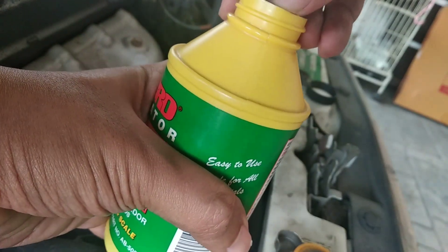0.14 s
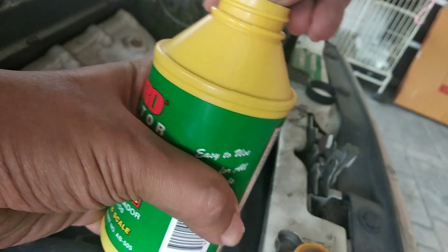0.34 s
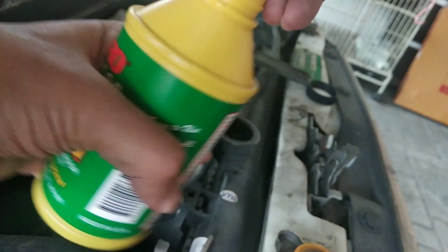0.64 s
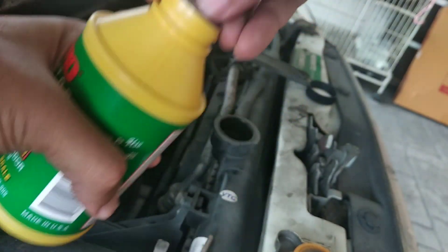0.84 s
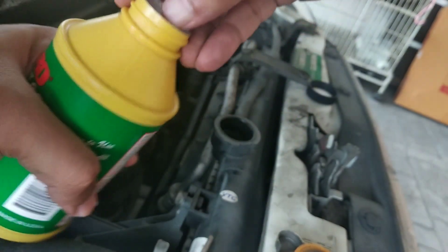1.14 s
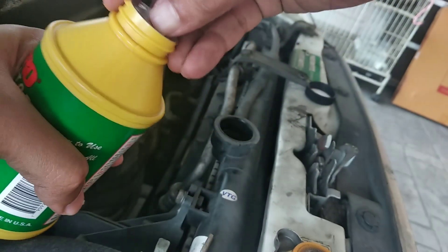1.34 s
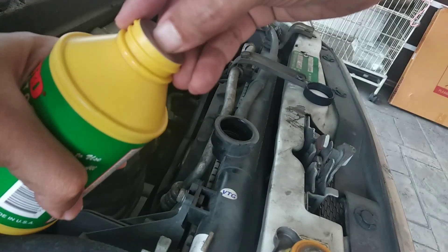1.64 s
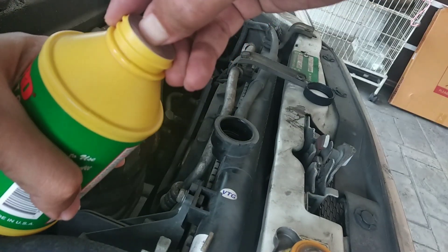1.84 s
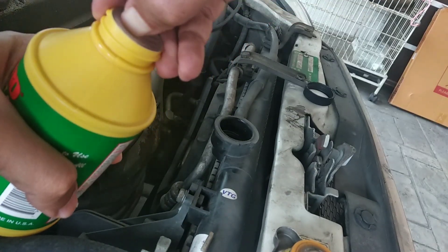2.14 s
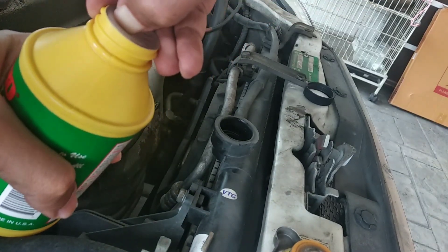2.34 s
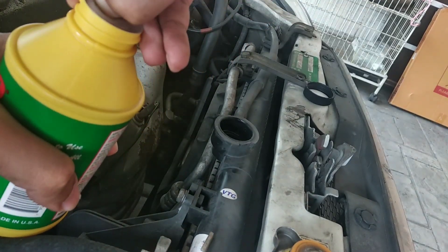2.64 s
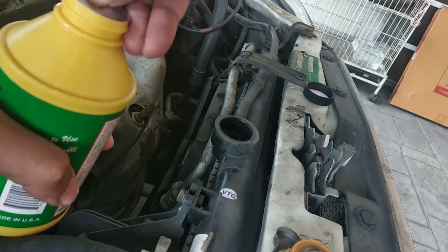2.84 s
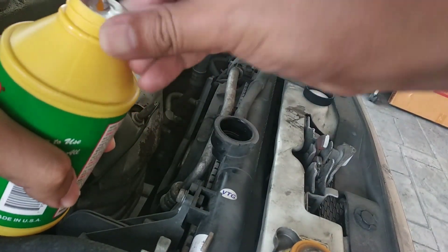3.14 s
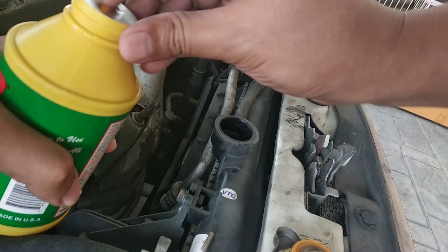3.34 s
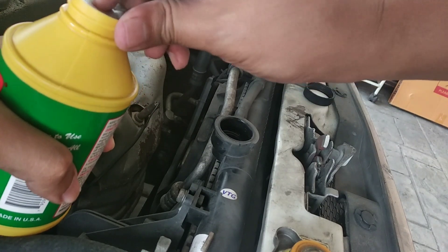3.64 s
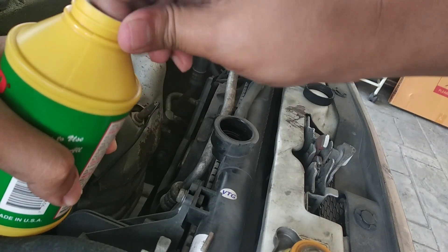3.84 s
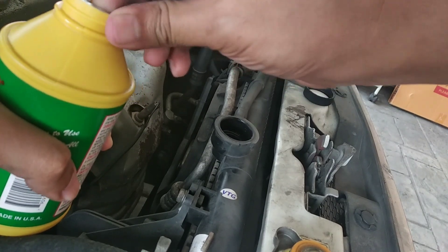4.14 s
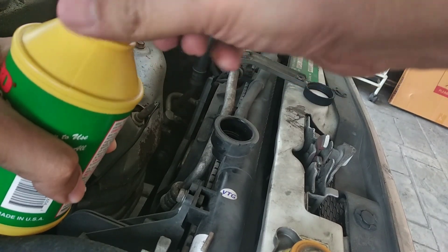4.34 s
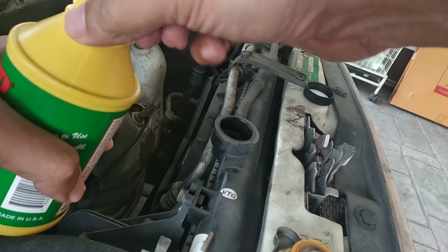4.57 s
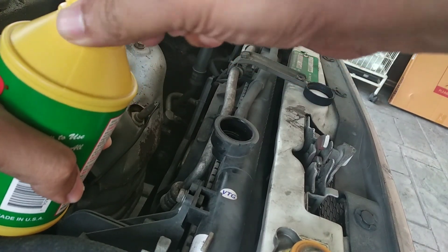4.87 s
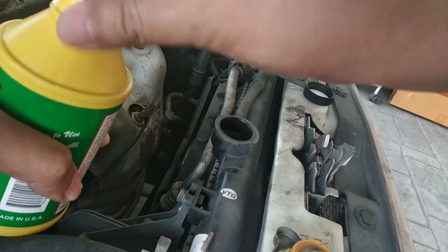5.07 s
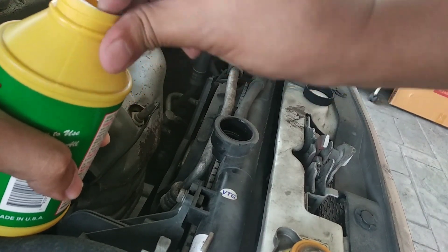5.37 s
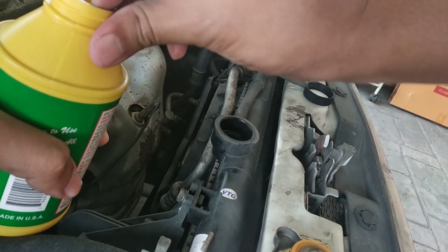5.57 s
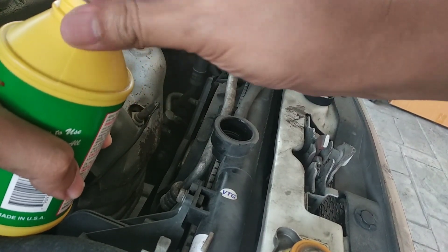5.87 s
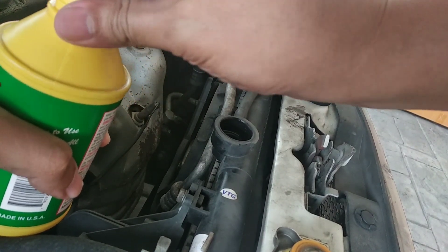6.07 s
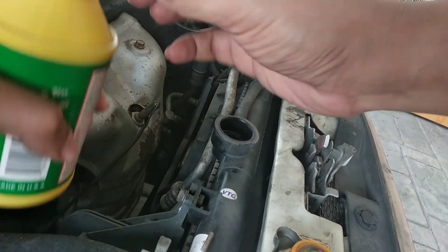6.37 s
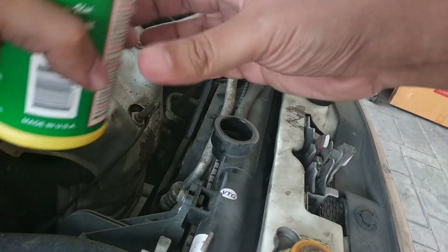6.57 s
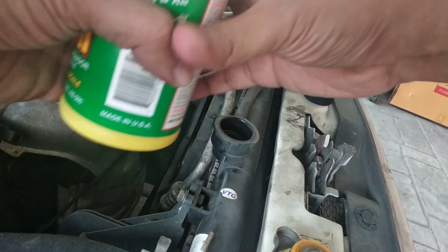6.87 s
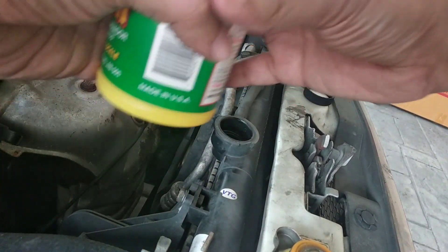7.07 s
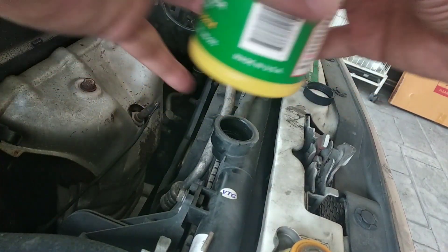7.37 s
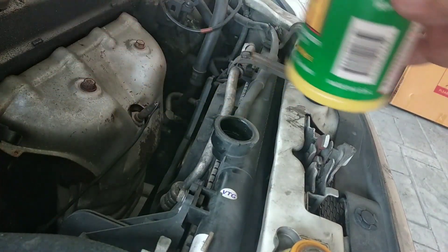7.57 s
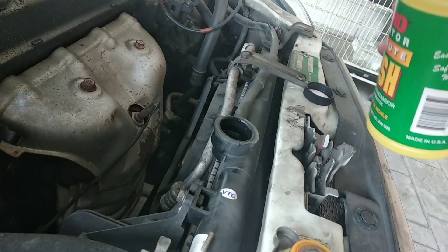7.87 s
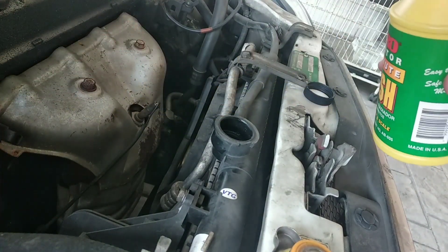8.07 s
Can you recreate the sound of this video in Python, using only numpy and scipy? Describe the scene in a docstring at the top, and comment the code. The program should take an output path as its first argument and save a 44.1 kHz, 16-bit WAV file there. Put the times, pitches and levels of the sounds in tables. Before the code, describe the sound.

Fingers grip a plastic bottle and tear its foil seal with sharp crackling snaps and hollow pops, over soft outdoor hiss and faint motor drone.

```python
"""Skin slides on plastic and a grip shifts with a low rumble, close to a phone, in soft outdoor hiss and drone.
Then the bottle's wall pops under the fingers: pushes ring its resonances, and a low thud goes with each.
Fingers tear at the foil seal: crackling noise swells to snaps, coloured by broad foil and bottle bands;
sharp cracks are short noise bursts with faint thin tones after them. Rubs and drags are filtered grains;
air, drone and rumble are shaped noise, a distant motor adds sine tones, and a short tail surrounds the bottle."""
import sys
import numpy as np
from scipy import signal
from scipy.fft import rfft, irfft
from scipy.io import wavfile
from scipy.ndimage import map_coordinates

SR = 44100
rng = np.random.default_rng(int(sys.argv[2]) if len(sys.argv) > 2 else 0)


def generate_wav(sig):
    """Save sig (samples, or channels by samples) to the path in sys.argv[1] as 16-bit PCM at SR."""
    pcm = np.round(np.clip(np.atleast_2d(sig).T, -1, 1) * 32767).astype(np.int16)
    wavfile.write(sys.argv[1], SR, pcm)


N = 362052
TIME = np.arange(N) / SR
SHOT = np.arange(SR // 5) / SR  # time inside one event [s]

# Spectrum shapes of outdoor hiss, low drone and handling rumble: (frequency [Hz], relative gain [dB])
AIR_COLOUR = [(270, -21), (340, -10.5), (420, 1.5), (600, -1), (1000, -5.5), (1700, -9.5), (2200, -8.5),
              (2700, -10.5), (5000, -15), (7500, -12.5), (10000, -15), (12500, -22.5), (16000, -23)]
DRONE_COLOUR = [(60, -42), (110, 0.5), (190, 5), (260, 0), (340, 1.5), (420, -6.5), (600, -65)]
RUMBLE_COLOUR = [(20, -24), (40, -16), (60, 1.5), (78, 7), (130, 6), (170, -8), (220, -12.5), (500, -79)]
# Level of the low drone, which dips at times: (time [s], level [dB])
DRONE_LEVELS = [(0.0, -67), (0.48, -72), (0.89, -85), (1.76, -103), (2.56, -82), (2.8, -65.5),
                (3.82, -62.5), (6.15, -62), (6.38, -70), (7.22, -65.5), (7.42, -83), (7.75, -77.5),
                (7.96, -63), (8.21, -69)]
# A distant motor hums within the drone: (frequency [Hz], level against the drone [dB])
MOTOR_HUM = [(75.8, -6.5), (301.5, -11.5)]
# Its faint whine: (frequency [Hz], level [dB])
MOTOR_WHINE = [(1217, -85.5), (2121, -88.5), (2202, -86)]
# Skin slides over plastic and foil, at times ringing the hollow bottle:
# (centre time [s], half length [s], peak level [dB], centre [Hz], width [Hz])
RUBS = [(0.0, 0.019, -49, 3200, 8300), (0.522, 0.049, -62.5, 2260, 8300), (0.616, 0.024, -57.5, 2590, 8300),
        (0.674, 0.0079, -54, 5900, 8300), (0.729, 0.025, -54.5, 2200, 900),
        (0.933, 0.023, -57.5, 4670, 8300), (1.166, 0.044, -60, 10000, 5500), (1.38, 0.041, -61, 5760, 8300),
        (1.462, 0.018, -47.5, 2350, 900), (1.875, 0.14, -65, 3370, 8300), (1.879, 0.011, -60, 8800, 1500),
        (2.87, 0.015, -59.5, 4000, 8300), (2.942, 0.011, -62, 8300, 4000), (3.105, 0.0082, -61, 1980, 5000),
        (3.185, 0.016, -62, 4250, 8300), (3.283, 0.027, -57, 5800, 8300), (3.393, 0.029, -58, 7040, 8300),
        (3.909, 0.024, -45.5, 463, 517), (3.95, 0.065, -57, 3650, 3530), (4.117, 0.0079, -65, 7700, 8300),
        (4.502, 0.016, -62.5, 9000, 8300), (6.276, 0.017, -59, 7550, 1210), (6.569, 0.01, -65, 950, 260),
        (6.86, 0.078, -63, 8700, 8300), (6.88, 0.013, -63, 925, 280), (7.063, 0.007, -61.5, 925, 220),
        (7.124, 0.0072, -61.5, 950, 220), (7.35, 0.012, -67, 925, 200), (7.83, 0.019, -64, 11400, 8300),
        (7.972, 0.029, -62, 11100, 8300)]
# The hands shift their grip:
# (start [s], length [s], rumble level [dB], level of the skin drag [dB], pitch of the drag [Hz])
GRIP_SHIFTS = [(0.0, 0.36, -49.5, -78, 200), (0.338, .11, -47.5, -72, 200), (0.509, 0.039, -59, -56.5, 290),
               (0.561, 0.056, -55, -61.5, 168), (0.674, 0.061, -55, -70.5, 303),
               (0.755, 0.041, -58, -92, 201), (0.928, 0.024, -60.5, -58.5, 226),
               (1.037, 0.024, -67, -92, 200), (1.221, 0.18, -48, -63.5, 340),
               (1.416, 0.097, -56.5, -81, 337), (1.64, 0.075, -78, -66.5, 228),
               (1.723, 0.043, -61, -62.5, 393), (1.784, 0.03, -80, -65, 322),
               (1.903, 0.026, -57, -61.5, 577), (2.216, 0.029, -68, -73, 430),
               (2.46, 0.03, -62.5, -89, 215), (2.537, 0.031, -50.5, -53, 185),
               (2.735, 0.027, -82, -62, 276), (3.869, 0.079, -55.5, -54, 286),
               (6.206, 0.072, -59, -79, 200), (6.51, 0.04, -58, -68, 140), (6.669, 0.045, -66, -60.5, 205),
               (6.99, 0.027, -82, -60, 212), (7.275, 0.044, -62.5, -58.5, 195),
               (7.34, 0.12, -87, -66.5, 180), (7.51, 0.087, -69, -91, 163), (7.646, 0.04, -74, -73, 149),
               (7.866, 0.06, -62, -71, 192), (8.034, 0.13, -56, -70, 188)]
# The wall pops under the fingers:
# (time [s], level [dB], wall pitch [Hz], sharp edge against the wall [dB], thud against the pop [dB])
POPS = [(0.4640, -47.5, 1704, -7.5, -20), (0.587, -57.5, 1590, 4, -2), (0.7154, -38, 1485, -1, -46),
        (0.7852, -51, 1430, -22, -42), (0.888, -64, 1510, 1, -22), (0.9235, -43.5, 1510, -7.5, -3.5),
        (0.934, -52, 1610, 6, -8), (0.959, -65, 1590, -1, 4), (1.3844, -47.5, 1560, 9, -43),
        (1.4586, -40.5, 2360, -13, -28), (3.8675, -43, 590, -11, -3), (4.634, -50, 1007, -24, -18),
        (4.969, -56, 804, -20, -26), (5.7262, -44.5, 937, -30, -35), (6.2664, -53.5, 970, -17, -16),
        (6.272, -51.5, 927, -27, -18), (6.308, -57, 950, -29, -26), (7.117, -64.5, 940, -15.5, -19)]
# Overtones of a popping wall: (frequency [Hz], width [Hz], relative level [dB])
WALL_OVERTONES = [(2040, 450, 20.5), (2660, 270, 15.5), (3870, 600, -35), (5030, 150, -24), (6660, 600, -4),
                  (8300, 280, -16)]
# The seal rips: (time of the snap [s], swell [s], fade [s], level [dB], snap against the crackle [dB],
# pitch of the loose flap [Hz], then against the foil: sheen [dB], rim and wall [dB], hollow bottle [dB];
# left minus right [dB]; narrow facet bands, each (frequency [Hz], level against the foil [dB]))
RIPS = [(0.718, 0.023, 0.0094, -50, -20, 8750, -26, -4.5, -0.5, -0.5, [(2950, -1), (5200, -3), (8900, -4)]),
        (1.4584, 0.013, 0.011, -41.5, -17, 6000, -31, -10, -19, -4, [(3550, -4.5), (5720, -12),
        (9150, -7)]), (2.492, 0.0073, 0.041, -54.5, -30, 5860, 10, -38, -32, -25, [(5400, -4)]),
        (2.518, 0.0067, 0.014, -28.5, -14, 7200, 3.5, -20, -7.5, -2, [(4080, -10.5), (4900, -16),
        (6030, -6), (9400, -5)]),
        (3.239, 0.0087, 0.011, -54, -29, 6360, -7, -11, 1.5, -7.5, [(3700, -0.5)]),
        (3.4888, 0.0072, 0.013, -38, -9, 10500, 9.5, -17.5, -14, -6, [(3150, -35), (5150, -7.5)]),
        (3.6780, 0.01, 0.011, -50, -9, 7150, -18, -8, -4, -5, []),
        (3.8659, 0.0068, 0.019, -31.5, -6.5, 8300, 7, -1, -3.5, -2, [(3700, -19), (4450, -12), (5100, -6),
        (10250, -1.5)]), (3.88, 0.0028, 0.0082, -42.5, 2, 7300, -6, -11, -1, -2.5, [(2700, -3),
        (4000, -0.5)]), (3.925, 0.017, 0.043, -52, -14, 8300, 9.5, 1.5, 0, -3, [(3700, 0), (4350, -12),
        (5750, -12)]), (4.203, 0.018, 0.017, -47.5, -0.5, 6900, 1.5, -7, -3, -6.5, [(3720, 0), (5250, -6.5),
        (6050, -8)]), (4.2847, 0.017, 0.022, -52, -4, 7400, -14, -17, -9, -9, [(3720, -24)]),
        (4.388, 0.015, 0.019, -51, -5, 7460, 4.5, -33, -14, -6.5, [(5400, -17), (7450, 3.5)]),
        (4.595, 0.012, 0.015, -55.5, -19, 9100, 6, -15, -18, -5, []),
        (4.633, 0.009, 0.0097, -41.5, -5, 6570, 5, -8, -5, -5, [(2920, -7.5), (4500, -23), (5420, -14),
        (10550, -13)]), (4.9690, .011, 0.031, -55.5, -5, 7950, 3, -17, -4, -4, []),
        (5.727, 0.011, 0.011, -40.5, -5.5, 7650, -9, -21.5, -7, -6.5, [(4100, -21), (5300, -16)]),
        (6.32, 0.021, 0.014, -54, -18, 7300, -12, -11.5, 0, -9, [(7450, -10)]),
        (7.385, 0.0059, 0.016, -73, -22, 3830, -18, 7.5, -2, -3, [])]
# Broad bands that colour every rip, in the order foil, sheen, rim, wall, neck, thud:
# (frequency [Hz], width [Hz], relative level [dB], left minus right [dB])
RIP_BANDS = [(7800, 3600, -2.5, 7.5), (11900, 9800, -3.5, 5), (4250, 1840, 0.5, 0.5), (2600, 3700, -1.5, 4),
             (946, 360, -7, 0.5), (252, 530, -13, 1.5)]
# The seal cracks sharply: (time [s], level [dB], centre [Hz], width [Hz], decay [s],
# faint tones against the crack [dB], left minus right [dB])
CRACKS = [(0.7155, -41, 2780, 2000, 0.0011, -22, 0), (1.458, -38.5, 4760, 6500, 0.00066, -27, -5),
          (1.468, -53, 6960, 6000, 0.0013, -19, -2), (2.5109, -35, 8050, 5000, 0.0041, -5, -7),
          (3.4902, -40.5, 8600, 9000, 0.00056, -14, -4), (3.858, -30, 8400, 9050, 0.0063, -16, 2),
          (3.866, -40, 4440, 2620, 0.0026, -1, 1), (3.9116, -50, 5000, 6000, .001, -12, -2),
          (3.9485, -68, 4500, 6000, .001, -15, -2), (4.2034, -53, 4170, 3000, .0015, -22, -8),
          (4.21, -56, 6000, 6000, 0.0011, -18, -4), (4.2846, -62, 7300, 4500, .0008, -18, -5),
          (4.389, -60, 7700, 5000, 0.0014, -18, -6), (4.623, -49, 9500, 9000, .004, -18, -5),
          (4.6358, -46.5, 6800, 1600, .0015, -23, -7), (4.647, -54, 11000, 9000, .002, -16, -3),
          (5.7262, -44.5, 7650, 2200, 0.0016, -18, -10), (6.3202, -52.5, 7200, 3000, 0.0028, -18, -4)]
# Faint thin tones added after each crack: (frequency [Hz], relative level [dB])
FINE_TONES = [(3322, -9.5), (4271, 0), (4594, 1), (4912, -9.5), (5541, 2), (6029, -0.5), (6938, 9),
              (7047, -3.5), (8146, -9), (8822, -2), (9122, -2), (9315, 10), (9455, 5), (10148, 0)]
# The bottle moves across the phone: (time [s], delay of the seal at the left port [samples],
# the same for the wall [samples]); below zero the left port hears it first
BEARING = [(0.5, 8, 6), (1.5, 9.5, 7), (2.5, 9, 9.5), (3.9, 9.5, 12.5), (5.7, 17.5, 13.5), (6.3, 17.5, 18),
           (6.8, 6.5, 6), (7.7, -14.5, -12)]

AIR_DB = -62.5
SHIFT_ATTACK_S, SHIFT_RELEASE_S, DRAG_WIDTH_HZ = 0.015, 0.01, 89
GRAINS_PER_RIP, JERKS_PER_S, SNAP_S = 150, 420, .0006
FACET_WIDTH_HZ = 370
FINE_TONES_T60_S = 0.25
TOP_HZ = 15900


def undb(db):
    """Decibels to gain."""
    return 10 ** (np.asarray(db) / 20)


def unit(x):
    """Scale each channel to unit energy."""
    return x / np.sqrt(np.sum(x ** 2, axis=-1, keepdims=True))


def burst(x, db):
    """Scale an event to a level, counted as rms over 30 ms."""
    return unit(x) * undb(db) * np.sqrt(.03 * SR)


def pan(db):
    """Left and right gains for a level difference, left minus right."""
    return undb(np.array([[db], [-db]]) / 2)


def add(track, x, s):
    """Mix an event in from time s on."""
    start = int(s * SR)
    track[:, start:start + x.shape[-1]] += x[..., :N - start]


def ring(x, hz, width_hz):
    """One resonance, gain 1 at its centre."""
    return signal.lfilter(*signal.iirpeak(hz, hz / width_hz, fs=SR), x)


def steep(x, hz, width_hz):
    """A resonance applied twice, at unit energy."""
    return unit(ring(ring(x, hz, width_hz), hz, width_hz))


def walk(rate):
    """Random wander through `rate` new values a second, with a spread near 1."""
    steps = rng.standard_normal(N // 10)
    return np.interp(TIME * rate, np.arange(len(steps)), steps)


def noise(colour, likeness):
    """Stereo noise of rms 1 with a given spectrum and left-right correlation."""
    hz, db = np.transpose(colour)
    bins = np.fft.rfftfreq(N, 1 / SR)
    gain = undb(np.interp(np.log(bins + 1), np.log(hz), db))
    shaped = irfft(rfft(rng.standard_normal((2, N))) * gain, N)
    mid, side = unit(shaped) * np.sqrt(N / 2)
    return np.sqrt(1 + likeness) * mid + np.sqrt(1 - likeness) * np.array([side, -side])


def tones(lines, waver_db, drift):
    """Sine tones that waver in level and phase (drift in radians)."""
    out = np.zeros(N)
    for hz, db in lines:
        level = np.sqrt(2) * undb(db + waver_db * walk(10.0))
        out += level * np.sin(2 * np.pi * hz * TIME + drift * walk(3.6))
    return out


def clicks(shape, per_s, spread_db):
    """Tiny clicks at random moments, of random sign and uneven size."""
    happen = rng.random(shape) < per_s / SR
    sign = np.sign(rng.standard_normal(shape))
    size = undb(spread_db * np.clip(rng.standard_normal(shape), -2, 2))
    return happen * sign * size


def outdoors(bass_db=-1.0):
    """Soft hiss and a low drone whose level dips at times, with the hum and whine of a distant motor."""
    air = noise(AIR_COLOUR, likeness=0.074) * undb(AIR_DB + .5 * walk(36))
    bass = noise(RUMBLE_COLOUR, likeness=0.87) * undb(bass_db + 1.4 * walk(4.9))
    hum = tones(MOTOR_HUM, waver_db=1.5, drift=0.23)
    low = noise(DRONE_COLOUR, likeness=0.76) * undb(3.1 * walk(21)) + bass + hum
    drone = low * undb(np.interp(TIME, *np.transpose(DRONE_LEVELS)))
    whine = tones(MOTOR_WHINE, waver_db=3.0, drift=1.0)
    return air + drone + whine


def rubs():
    """Fine stick-slip grains that swell and fade with each slide of a finger."""
    out = np.zeros((2, N))
    pressure = undb(1.5 * walk(46))
    grains = clicks((2, N), per_s=3700, spread_db=7.5) * pressure
    for s, half, db, hz, width in RUBS:
        slide = np.exp(-((TIME - s) / half) ** 2 / 2)
        out += steep(grains, hz, width) * np.sqrt(N) * undb(db) * slide
    return out


def shifts(flutter_db=2.0):
    """Each change of grip shakes the phone with a low flutter, while pressed skin drags on the bottle."""
    shake = noise(RUMBLE_COLOUR, likeness=0.9) * undb(flutter_db * walk(42))
    grains = clicks(N, per_s=1300, spread_db=8.5)
    out = np.zeros((2, N))
    for s, length, rumble_db, drag_db, drag_hz in GRIP_SHIFTS:
        drag = steep(grains, drag_hz, DRAG_WIDTH_HZ) * np.sqrt(N)
        rise = (TIME - s) / SHIFT_ATTACK_S
        fall = (s + length - TIME) / SHIFT_RELEASE_S
        effort = np.exp(np.minimum(np.minimum(rise, fall), 0))
        out += effort * (undb(rumble_db) * shake + undb(drag_db) * drag)
    return out


def pops(wall_q=5.0, grain_db=-9, thud_s=0.017, thud_width_hz=260, scuff_db=-3, scuff_s=0.0073, soft_hz=8000):
    """The wall buckles: one push rings its main mode and overtones, and the bottle thuds in the hand."""
    out = np.zeros((2, N))
    for s, db, hz, edge_db, thud_db in POPS:
        push = signal.unit_impulse(len(SHOT))
        rough = unit(rng.standard_normal((2, len(SHOT))) * np.exp(-SHOT / scuff_s))
        scuff = push + undb(scuff_db) * rough
        wall = steep(push + undb(grain_db) * scuff, hz, hz / wall_q)
        edge = unit(sum(undb(g) * ring(scuff, f, w) for f, w, g in WALL_OVERTONES))
        add(out, burst(wall + undb(edge_db) * edge, db), s)
        # the finger presses in just before the wall gives
        thud = steep(rng.standard_normal(len(SHOT)) * np.exp(-SHOT / thud_s), 217, thud_width_hz)
        add(out, burst(thud, db + thud_db), s - .007)
    # the fingertips damp the top
    return signal.sosfilt(signal.butter(2, soft_hz, fs=SR, output="sos"), out)


def rips(flap_width_hz=900, flap_db=-4, apart_db=-1, rounding=1.47, facet_lean_db=3, facet_focus=1.7, stutter_db=1.5):
    """Crackling noise swells briefly to a snap and fades, coloured by broad foil and bottle bands."""
    out = np.zeros((2, N))
    lead = .07  # room for the swell before the snap [s]
    t = SHOT - lead
    for s, swell, fade, db, snap_db, flap_hz, sheen_db, shell_db, hollow_db, pan_db, facets in RIPS:
        envelope = np.exp(-np.maximum(-t / swell, t / fade) ** rounding)
        # the level stutters in small jerks
        jerks = np.interp(SHOT * JERKS_PER_S, np.arange(len(t)), rng.standard_normal(len(t)))
        envelope = envelope * undb(stutter_db * jerks)
        bands = [(flap_hz, flap_width_hz, flap_db, 0)] + list(RIP_BANDS)
        # rim and wall share one level, as do the neck and the thud of the hollow bottle
        drives = [0, 0, sheen_db, shell_db, shell_db, hollow_db, hollow_db]
        # narrow facet bands change with every rip
        bands += [(hz, FACET_WIDTH_HZ, facet_db, facet_lean_db) for hz, facet_db in facets]
        drives += [0] * len(facets)
        for (hz, width, band_db, lean_db), drive_db in zip(bands, drives):
            # facets keep closer to the peak
            shape = envelope ** (facet_focus if width == FACET_WIDTH_HZ else 1)
            # each band has its own grains; a slow rip spreads them into a rattle
            grains = clicks((3, len(t)), per_s=GRAINS_PER_RIP / (swell + fade), spread_db=4.5)
            crackle = unit(grains * shape)
            snap = unit(rng.standard_normal((3, len(t))) * (t >= 0) * np.exp(-abs(t) / SNAP_S))
            # the snap is blunter than the crackle and weakens above 7 kHz
            blunt_snap = undb(snap_db) * min(7000 / hz, 1) * snap
            common, *sides = steep(crackle + blunt_snap, hz, width)
            # the treble differs more from side to side
            spread = undb(apart_db) * min(hz / 3000, 1) * np.array(sides)
            heard = burst(common + spread, db + band_db + drive_db)
            add(out, heard * pan(pan_db + lean_db), s - lead)
    return out


def cracks():
    """The seal gives way at one spot: an abrupt, very short burst."""
    out = np.zeros((2, N))
    for s, db, hz, width, decay, _, pan_db in CRACKS:
        split = rng.standard_normal(len(SHOT)) * np.exp(-SHOT / decay)
        add(out, burst(steep(split, hz, width), db) * pan(pan_db), s)
    return out


def fine_tones():
    """Faint thin tones added after each crack, weighted towards its centre frequency."""
    out = np.zeros((2, N))
    tone_hz, tone_db = np.transpose(FINE_TONES)
    decay = np.exp(-np.log(1000) * SHOT / FINE_TONES_T60_S)
    for s, db, hz, width, _, tones_db, pan_db in CRACKS:
        weights = undb(tone_db) / (1 + (2 * (tone_hz - hz) / width) ** 2)
        start_phase = rng.random((len(tone_hz), 1))  # in cycles
        sines = np.sin(2 * np.pi * (tone_hz[:, None] * SHOT + start_phase))
        add(out, burst(weights @ sines * decay, db + tones_db) * pan(pan_db), s)
    return out


def space(x, lag, near_db, tail_db, t60=0.33):
    """Sound reaches the nearer port first; the hands scatter it and nearby walls add a short tail."""
    t = np.arange(SR // 2) / SR
    near, tail = rng.standard_normal((2, 2, len(t)))
    near = unit(near * (t > .001) * np.exp(-t / 0.0048))
    dull = signal.sosfiltfilt(signal.butter(2, 9500, fs=SR, output="sos"), tail)
    bright = 0.98 * (tail - dull)
    t60_top = t60 * 3 / 4  # the treble dies sooner
    fading = dull * undb(-60 * t / t60) + bright * undb(-60 * t / t60_top)
    # echoes come back in uneven clumps and build up over a few milliseconds
    clumps = undb(2.2 * walk(300)[:len(t)])
    tail = unit(fading * clumps * (1 - np.exp(-t / 0.0039)))
    left = map_coordinates(x[0], [np.arange(N) - lag], order=5)  # fractional delay
    direct = np.array([left, x[1]])
    echoes = undb(near_db) * near + undb(tail_db) * tail
    return direct + signal.fftconvolve(x, echoes, axes=1)[:, :N]


def scene(lean_db=-0.8, wall_lean_db=-2.0):
    """Bottle, seal and hands over the outdoor background, which leans a little to the right."""
    when, seal_lag, wall_lag = np.transpose(BEARING)
    background = (outdoors() + shifts()) * pan(lean_db)
    seal = space(rubs() + rips(), np.interp(TIME, when, seal_lag), near_db=-3.0, tail_db=-11)
    struck = pops() * pan(wall_lean_db) + cracks()
    bottle = space(struck, np.interp(TIME, when, wall_lag), near_db=-7.5, tail_db=-23)
    return background + seal + bottle + fine_tones()


def record(dry):
    """The phone cuts the top with a steep low-pass."""
    return signal.sosfilt(signal.ellip(10, .2, 80, TOP_HZ, fs=SR, output="sos"), dry)


dry = scene()
out = record(dry)
generate_wav(out)
```